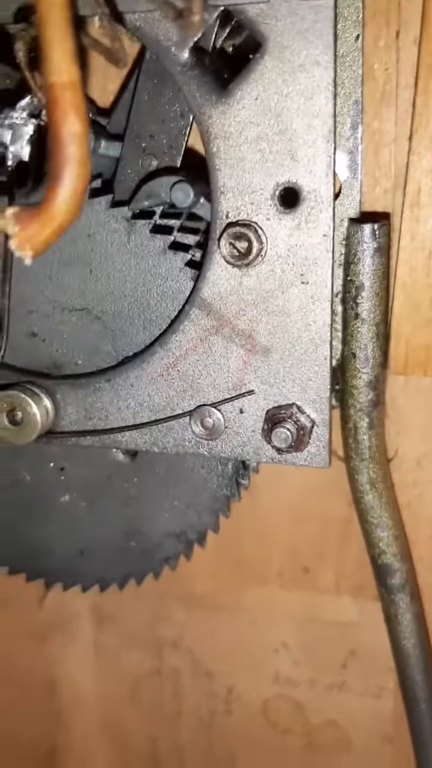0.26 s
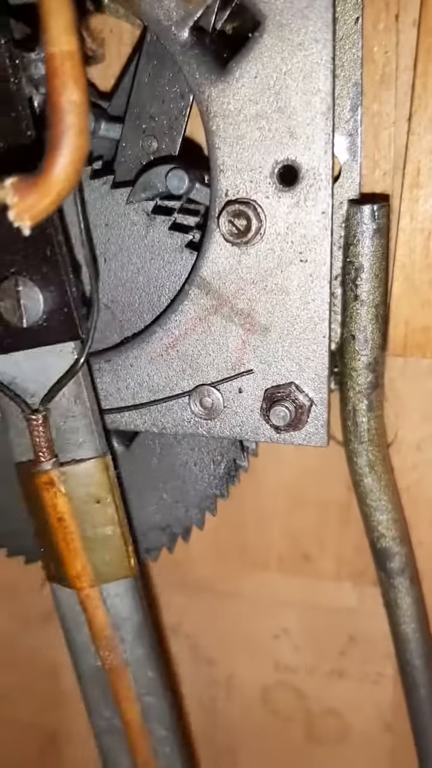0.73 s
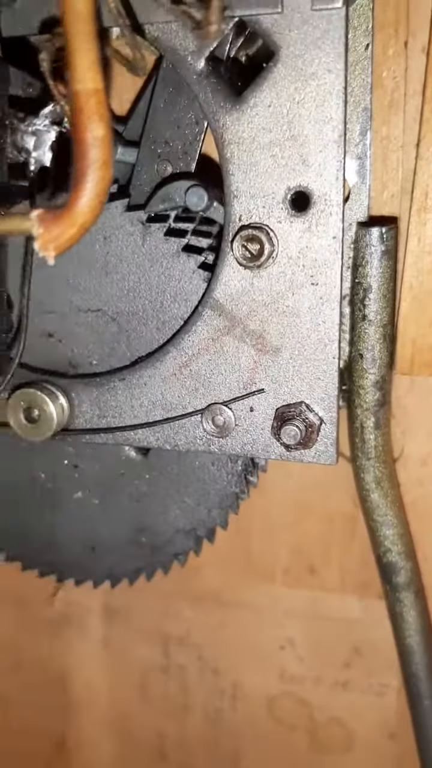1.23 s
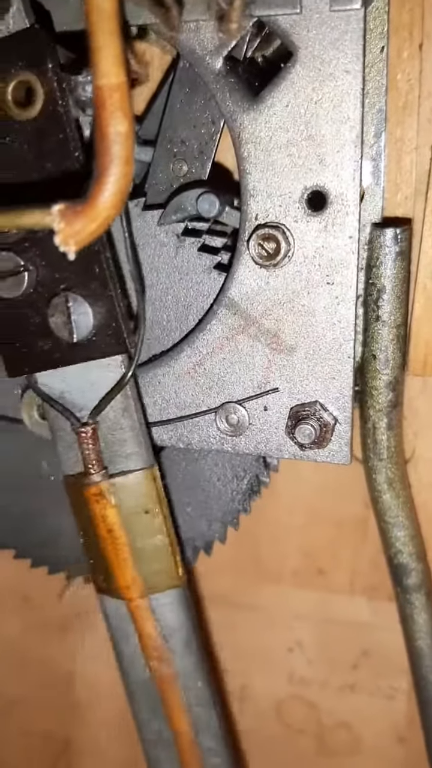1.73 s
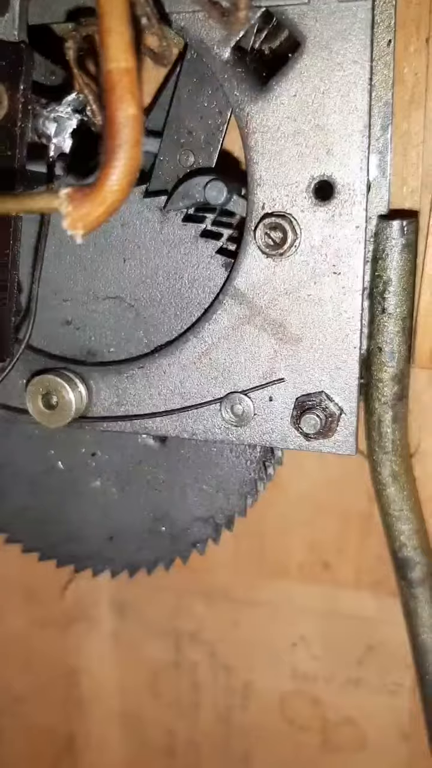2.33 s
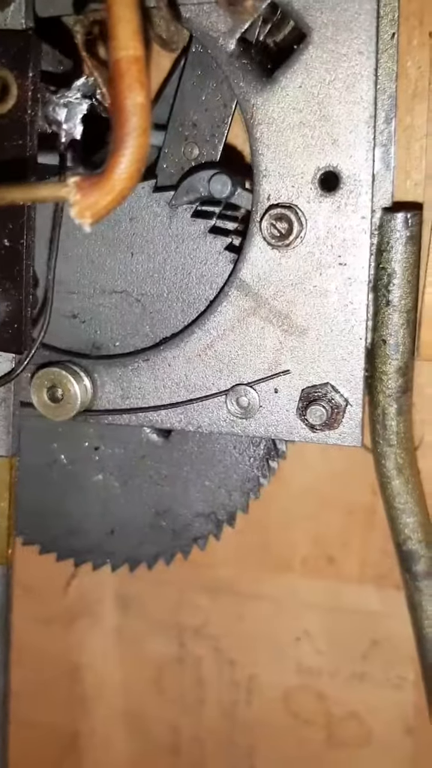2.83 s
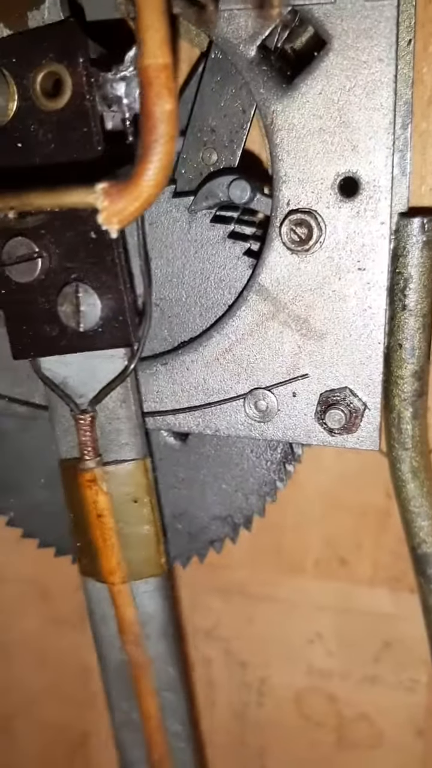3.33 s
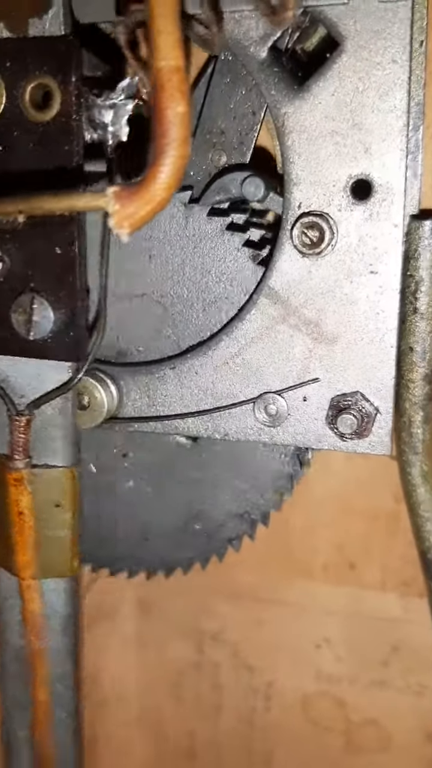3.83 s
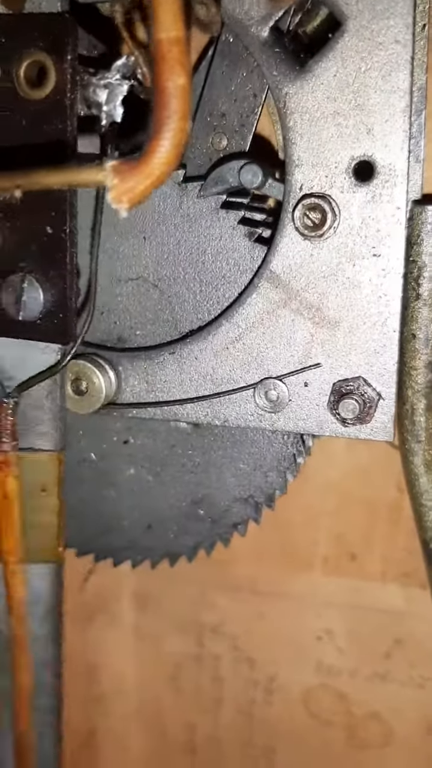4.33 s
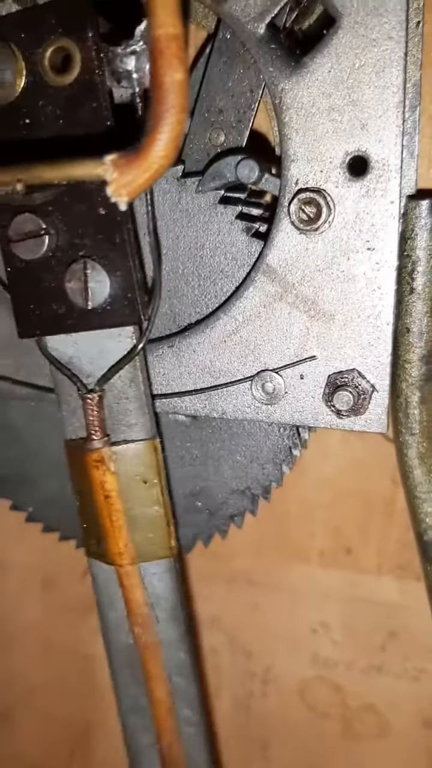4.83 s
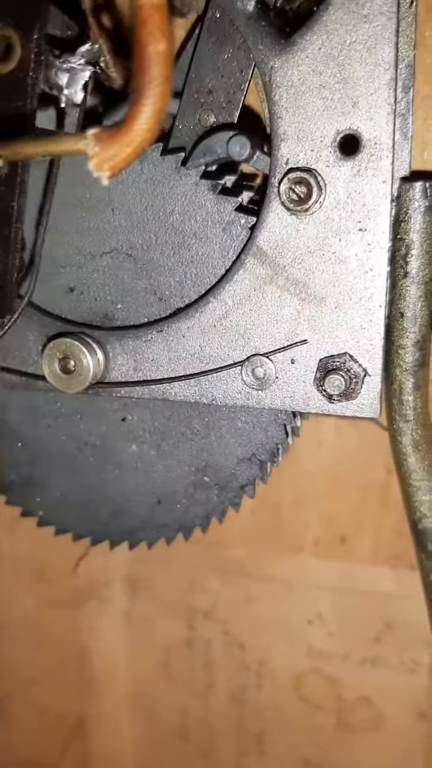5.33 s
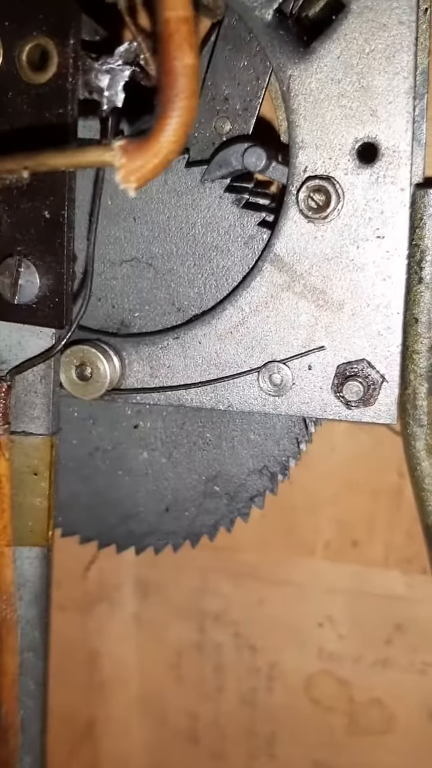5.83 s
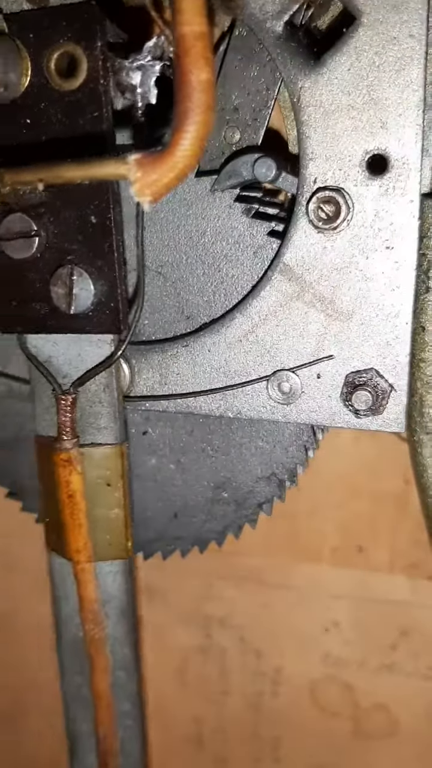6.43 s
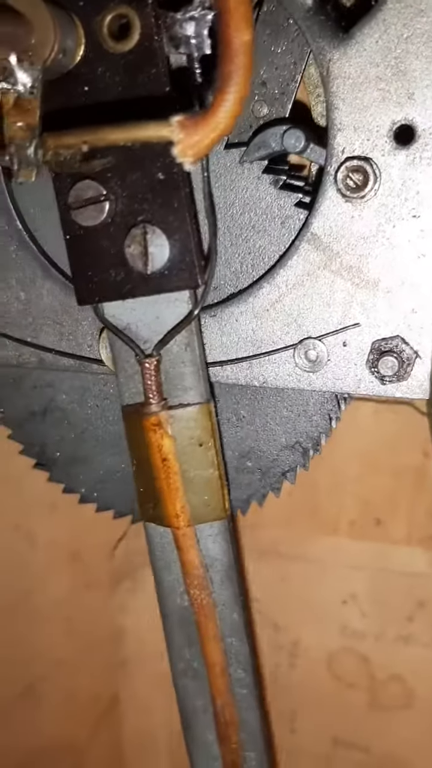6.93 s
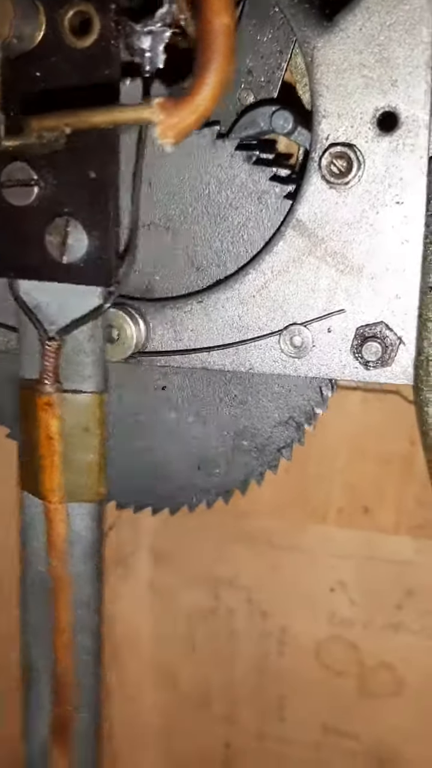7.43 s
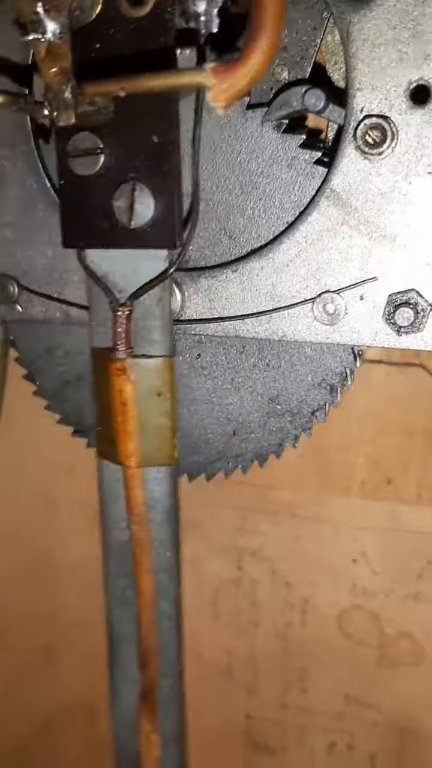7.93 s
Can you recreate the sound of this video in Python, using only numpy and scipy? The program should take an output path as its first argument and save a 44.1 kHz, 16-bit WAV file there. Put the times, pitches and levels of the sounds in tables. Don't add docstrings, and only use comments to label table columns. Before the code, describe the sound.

An old clock mechanism knocks and clatters unevenly, its wooden case thudding softly, with tiny high pings, faint distant ticking and constant microphone hiss.

```python
import sys
import numpy as np
from scipy import signal
from scipy.fft import rfft, irfft, next_fast_len
from scipy.io import wavfile
from scipy.ndimage import uniform_filter1d

SR = 44100
rng = np.random.default_rng(int(sys.argv[2]) if len(sys.argv) > 2 else 0)


def makeup_ratio(level_db):
    decades = np.asarray(level_db, float) / 20
    return 10 ** decades


def to_wav(sig):
    pcm = np.clip(np.atleast_2d(sig), -1, 1) * 32767
    pcm = np.round(pcm).astype(np.int16)
    wavfile.write(sys.argv[1], SR, pcm.T)


N = 360297

# frequency in Hz, level in dB per Hz.
HISS_COLOUR = [(50, -9), (250, -21.5), (450, -11), (590, -7), (750, -7), (1100, -3), (1550, -3.5),
               (1900, 0), (5500, 0), (7400, -4), (8700, -21), (10300, -15.5), (12500, -9.5), (15000, -10.5)]
# centre in Hz, width in Hz, lift in dB.
CASE_AIR = [(592, 85, 5), (1530, 53, 7.5)]
HISS_DB, HISS_TOP_HZ = -48.5, 15800

# start in seconds, peak in dB, rub in seconds, pitch in Hz.
RUBS = [
    (.002, -30.5, 0.034, 1476),
    (.53, -42.5, 0.044, 470),
    (1.451, -40, 0.052, 500),
    (2.076, -28, 0.022, 1483),
    (3.501, -46, 0.042, 497),
    (5.983, -33.5, 0.0084, 1520),
    (6.56, -45, 0.067, 508),
    (6.747, -38.5, 0.015, 1560),
    (7.09, -53, 0.069, 600),
    (7.423, -30.5, 0.056, 1480),
]

# frequency in Hz, level in dB, 60 dB decay in seconds.
FAR_MODES = [(1530, -8, .06), (2400, -1, .05), (3480, 0, .05), (4100, -5, .03), (5000, -5, .03),
             (5900, 0, .04), (7200, -8, .03)]
# start in seconds, peak in dB, pitch in Hz.
STRAY_TICKS = [
    (2.3712, -37, 1900),
    (3.02, -42, 3480),
    (5.4967, -34, 7000),
    (7.1092, -42, 3480),
]
QUICK_START_S, QUICK_BEAT_S, QUICK_LIMP_S, QUICK_DB = 0.0218, 0.2778, 0.0039, -31
TOOTH_S, TOOTH_BEATS, TOOTH_WORST = 0.0036, 7.4, 5.42
DRIFT_S, DRIFT_BEATS, DRIFT_LATEST = 0.0107, 36.75, 0.28
SLOW_START_S, SLOW_BEAT_S, SLOW_LIMP_S, SLOW_DB = 0.0906, 0.6677, -0.005, -33.5
TICK_HZ, TOCK_HZ, SLOW_HZ = 2800, 2400, 5500

# start in seconds, peak in dB, pitch in Hz.
NUDGES = [(0.029, -27.5, 1560), (0.057, -38, 450), (0.157, -37, 830), (1.055, -42, 680), (1.469, -35, 480),
          (2.215, -38, 920), (3.228, -33.5, 560), (3.29, -41, 815), (3.993, -36, 950), (5.242, -36, 830),
          (5.266, -35, 1570), (5.498, -37, 447), (5.941, -43, 832), (6.119, -40, 480), (7.625, -36.5, 1480),
          (7.799, -36.5, 1520), (8.054, -32.5, 1480), (8.123, -39, 540)]
# start in seconds, peak in dB, contact in seconds, pitch in Hz.
KNOCKS = [(0.387, -23, 0.012, 676), (0.785, -28.5, 0.0033, 1210), (1.793, -26, 0.0034, 836),
          (2.098, -28, 0.021, 1300), (2.493, -19.5, 0.0075, 1290), (2.534, -24.5, 0.0075, 610),
          (2.551, -18, 0.029, 810), (2.563, -35, 0.0097, 1320), (3.085, -22.5, 0.011, 860),
          (3.115, -14, 0.0081, 1520), (3.75, -12, 0.015, 1540), (3.761, -14.5, 0.014, 980),
          (3.799, -22.5, 0.0058, 1510), (3.82, -25.5, 0.032, 730), (4.38, -16.5, 0.0088, 775),
          (4.461, -12.5, 0.0085, 1460), (4.498, -32, 0.019, 1600), (4.963, -23.5, 0.011, 900),
          (5.575, -14.5, 0.0071, 1000), (5.627, -19.5, 0.0027, 1000), (5.639, -15, 0.006, 836),
          (5.686, -20, 0.02, 940), (7.46, -30.5, 0.034, 765), (7.577, -27, 0.0048, 990),
          (7.874, -20, 0.0045, 1750)]
# frequency in Hz, level in dB, 60 dB decay in seconds.
PLATE_MODES = [(450, -4, .06), (590, -3, .07), (807, 0, .055), (950, -4, .05), (1145, -6, .05),
               (1320, -2, .055), (1490, 0, .055), (2050, -10, .03)]

# time of peak in seconds, back panel in dB,
# side panels in dB above the back, 60 dB decay in seconds.
THUDS = [(0.06, -37, -2, 0.26), (0.392, -34, -1.5, 0.34), (0.79, -47, 6.5, 0.17), (1.062, -55, 1, 0.36),
         (1.466, -48.5, 0.5, 0.4), (1.8, -44.5, -4, 0.36), (2.091, -48.5, 5.5, 0.37),
         (2.234, -49.5, -1, 0.67), (2.5, -41, 0, 0.42), (3.099, -38.5, 1.5, 0.62), (3.762, -31.4, -1, 0.77),
         (4.385, -37, 0, 0.6), (4.769, -58, 0, 0.26), (4.97, -42.5, 3, 0.33), (6.122, -42, -6, 0.53),
         (7.275, -65.5, -18, 0.67), (7.588, -42.5, -1.5, 0.29), (7.879, -38.5, 3, 0.31)]
# time of peak in seconds, back panel in dB,
# side panels in dB above the back, 60 dB decay in seconds.
SWAYS = [(0.03, -52.5, 10, 0.21), (0.19, -42.5, -6.5, 0.27), (0.245, -52, -11, 0.1), (0.355, -48, -2, 0.17),
         (0.82, -46.5, -2, 0.2), (0.875, -55, -8, 0.15), (0.979, -56, -8, 0.33), (1.902, -54, 6, 0.28),
         (2.551, -34, -2.1, 0.48), (2.799, -57, -1.5, 0.91), (3.243, -46, -2.5, 0.18),
         (3.319, -46, 1.5, 0.32), (3.931, -40, -1, 0.076), (4.016, -48, -4, 0.8), (4.479, -44, -3, 0.25),
         (4.59, -40, -4.5, 0.21), (5.061, -48, -12, 0.21), (5.272, -52.2, -4, 0.88),
         (5.411, -42, -4.5, 0.15), (5.518, -55.5, 7, 0.25), (5.605, -34.0, 1, 0.74),
         (5.71, -30.5, -3, 0.075), (5.779, -36.5, -22, 0.15), (5.962, -44.5, -2.5, 0.3),
         (6.371, -53, -3, 0.22), (7.483, -44.6, 3.5, 0.29), (7.708, -51, -7, 0.41),
         (7.818, -42.5, -13, 0.34), (8.1, -51.5, -4, 0.96)]
# centre in Hz, width in Hz, level in dB.
BACK_PANEL = [(113.5, 31, -3), (185.2, 9.8, 5.5), (201.6, 6.8, 8.5), (235.6, 17.3, 2.5)]
# centre in Hz, width in Hz, level in dB.
SIDE_PANELS = [(341.5, 51, -0.5), (367.2, 31, 3.5), (450, 270, -11)]
THUD_RISE_S, SWAY_RISE_S = 0.03, 0.17
SIDES_RING = 0.77

# start in seconds, peak in dB, rattle in seconds, top band in dB.
CLACKS = [(0.386, -23.5, 0.012, -18), (1.7925, -30.5, 0.0056, -27), (2.492, -13.5, 0.016, -11),
          (2.503, -23, 0.015, -26), (2.5501, -22.5, 0.014, -13.5), (3.071, -33, 0.0097, -34),
          (3.0863, -20, 0.013, -14), (3.7511, -14.5, 0.01, -14.5), (4.3786, -15.5, 0.01, -10.5),
          (4.3884, -24.5, 0.012, -28), (4.462, -41, 0.0076, -28), (4.963, -28.5, 0.012, -31),
          (5.5736, -6.5, 0.0082, -14), (5.5882, -16.5, 0.012, -20), (5.6287, -19.5, 0.013, -12.5),
          (5.687, -18, 0.0086, -12.5), (7.873, -24.5, 0.0068, -25)]
# frequency in Hz, level in dB, 60 dB decay in seconds.
WHEEL_MODES = [(2400, -5, .02), (3360, -6, .025), (3730, 0, .02), (4060, -4, .025), (4550, -4, .025),
               (5400, -3, .015), (5710, -4, .025), (6600, -2, .01)]

# start in seconds, tap in dB, ring in dB, long mode in dB.
PINGS = [
    (2.2211, -26.5, -34, -44),
    (3.3403, -40, -39, -52),
    (4.0335, -25.5, -31, -46),
    (4.6111, -35.5, -34.5, -56),
    (5.2063, -30.5, -41, -39),
    (6.6185, -35.5, -40, -35),
    (7.5992, -35.5, -40, -46),
    (8.1214, -40, -51, -48),
]
PIN_HZ = [5940, 8930, 9360, 13620, 13850, 15550]
# level in dB, 60 dB decay in seconds.
PIN_STRENGTHS = [(-18, .15), (-18, .085), (-14, .035), (-3, .05), (0, .06), (-18, .05)]
# frequency in Hz, level in dB, 60 dB decay in seconds.
PIN_LONG_MODE = [(12400, 0, .2)]

# frequency in Hz, left-right likeness from 0 to 1.
NEAR_ALIKE = [(170, 0.93), (350, 0.78), (700, 0.71), (1100, 0.32), (3000, 0.06), (16000, 0.06)]
# frequency in Hz, left-right likeness from 0 to 1.
ROOM_ALIKE = [(170, 0.37), (350, 0.51), (700, 1), (1100, 0.011), (16000, 0.015)]
# frequency in Hz, left minus right in dB.
PORT_COLOUR = [(150, -2), (350, -1), (700, -4.5), (1100, -7.5), (2500, -8), (5500, -10), (7500, -6.5),
               (9000, 0), (11500, -2), (14000, -8)]
PORT_LAG_S = 0.000239


def unit(x):
    return x / np.sqrt(np.mean(x ** 2) + 1e-20)


def along(points, hz):
    f, v = np.transpose(points)
    return np.interp(np.log(hz + 1), np.log(f + 1), v)


def filtered(x, response):
    m = next_fast_len(N + 8192)
    hz = np.fft.rfftfreq(m, 1 / SR)
    return irfft(rfft(x, m) * response(hz), m)[..., :N]


def rattle(seconds, spiky_db, rise=0.001):
    t = np.arange(SR // 8) / SR
    sizes = makeup_ratio(spiky_db * rng.standard_normal(len(t)))
    envelope = (1 - np.exp(-t / rise)) * np.exp(-(t / max(seconds, 0.001)) ** 1.35)
    return rng.standard_normal((2, len(t))) * sizes * envelope


def ring(modes, scatter_db=3, lift_db=0):
    t = np.arange(SR // 5) / SR
    hz, db, t60 = np.transpose(modes)[..., None]
    db = db + scatter_db * rng.standard_normal(db.shape) + np.reshape(lift_db, (-1, 1))
    return np.sum(makeup_ratio(db - 60 * t / t60) * np.sin(2 * np.pi * hz * t), 0)


def clutter(lo_hz, hi_hz, t60, db):
    t = np.arange(SR // 5) / SR
    band = signal.butter(3, [lo_hz, hi_hz], "band", fs=SR, output="sos")
    return signal.sosfilt(band, rng.standard_normal(len(t)) * makeup_ratio(db - 60 * t / t60))


def strike(burst, response):
    return signal.fftconvolve(burst, response[None], axes=1)


def add(track, s, db, pair):
    track[:, round(s * SR):][:, :pair.shape[1]] += makeup_ratio(db) * pair / np.abs(pair).max()


def hiss():
    z = signal.stft(rng.standard_normal((2, N)), nperseg=512)[2]
    field = rng.standard_normal(z.shape[1:])
    field = uniform_filter1d(uniform_filter1d(field, 12, 0), 4, 1)
    patchy = signal.istft(z * makeup_ratio(1.5 * unit(field)), nperseg=512)[1][:, :N]

    def colour(hz):
        air_db = sum(db * np.exp(-((hz - c) / w) ** 2) for c, w, db in CASE_AIR)
        return makeup_ratio(along(HISS_COLOUR, hz) - 40 * (hz > HISS_TOP_HZ) + air_db)

    faint = (rng.random(N) < 30 / SR) * rng.random(N)
    fade = np.exp(-np.arange(SR // 8) / (0.019 * SR))
    swell = 1 + 0.77 * signal.fftconvolve(faint, fade)[:N]
    return makeup_ratio(HISS_DB) * swell * unit(filtered(patchy, colour))


def rod(track):
    for s, db, seconds, hz in RUBS:
        rub = rattle(seconds, spiky_db=7.0, rise=0.00045)
        add(track, s, db, strike(rub, ring([(hz, 0, 0.05), (0.99 * hz, -4, 0.04)], 1.1)))
    return track


def beats():
    k = np.arange(int(N / SR / QUICK_BEAT_S) + 1)

    def cycle(size, length, top):
        return size * np.cos(2 * np.pi * (k - top) / length)

    limp = (QUICK_LIMP_S + cycle(TOOTH_S, TOOTH_BEATS, TOOTH_WORST)) * (-1) ** k
    drift = cycle(DRIFT_S, DRIFT_BEATS, DRIFT_LATEST)
    quick_s = QUICK_START_S + QUICK_BEAT_S * k + limp + drift
    quick = [(s, QUICK_DB, TOCK_HZ if j % 2 else TICK_HZ) for j, s in enumerate(quick_s)]
    j = np.arange(int(N / SR / SLOW_BEAT_S) + 1)
    slow_s = SLOW_START_S + SLOW_BEAT_S * j + SLOW_LIMP_S * (-1) ** j
    slow = [(s, SLOW_DB, SLOW_HZ) for s in slow_s]
    return quick + slow + STRAY_TICKS


def far_clocks(track):
    mode_hz = np.transpose(FAR_MODES)[0]
    for s, db, hz in beats():
        octaves = np.abs(np.log2(mode_hz / hz))
        lift_db = -np.minimum(5 * octaves, 6)
        body = ring(FAR_MODES, 2.5, lift_db) + clutter(1800, 7500, t60=0.04, db=7)
        add(track, s, db, strike(rattle(0.014, spiky_db=4, rise=0.0015), body))
    return track


def lever(track):
    mode_hz = np.transpose(PLATE_MODES)[0]
    nudges = [(s, db, 0.016, hz) for s, db, hz in NUDGES]
    for s, db, seconds, hz in KNOCKS + nudges:
        lift_db = -7 * np.log2(mode_hz / hz) ** 2
        plate = ring(PLATE_MODES, 1.8, lift_db) + clutter(0.5 * hz, 1.35 * hz, t60=0.05, db=11)
        add(track, s, db, strike(rattle(seconds, spiky_db=5, rise=0.0003), plate))
    return track


def shudder(panels):
    def modes(f):
        total = 0
        for k, (c, w, db) in enumerate(panels):
            damping = 1j * f * w
            total = total + (-1) ** k * makeup_ratio(db) * damping / (c * c - f * f + damping)
        return total

    x = unit(filtered(rng.standard_normal((2, N)), modes))
    power = np.abs(uniform_filter1d(x ** 2, 1800, axis=1))
    return unit(x / np.sqrt(power + 0.029))


def case():
    t = np.arange(0, N, 64) / SR
    back, sides = 0, 0
    for jolts, rise in [(THUDS, THUD_RISE_S), (SWAYS, SWAY_RISE_S)]:
        s, db, sides_db, t60 = np.transpose(jolts)[..., None]

        def swing(ring_s):
            return -60 * np.maximum((s - t) / rise, (t - s) / ring_s)

        back = back + np.sum(makeup_ratio(db + swing(t60)) ** 2, 0)
        sides = sides + np.sum(makeup_ratio(db + sides_db + swing(SIDES_RING * t60)) ** 2, 0)

    def full(power):
        return np.interp(np.arange(N) / SR, t, np.sqrt(power))

    return full(back) * shudder(BACK_PANEL) + full(sides) * shudder(SIDE_PANELS)


def pawls(track):
    top = signal.butter(3, 10500, "high", fs=SR, output="sos")
    for s, db, seconds, top_db in CLACKS:
        burst = rattle(seconds, spiky_db=6.5, rise=0.000043)
        wheel = ring(WHEEL_MODES) + clutter(1450, 6600, t60=0.0069, db=26)
        add(track, s, db, strike(burst, wheel))
        add(track, s, db + top_db + 14.0, signal.sosfilt(top, burst))
    return track


def pin(track):
    tap_modes = [(6500, 0, 0.005), (7300, -3, 0.004), (4200, -14, 0.004), (15000, -6, 0.003)]
    pin_modes = np.column_stack([PIN_HZ, PIN_STRENGTHS])
    for s, db, ring_db, long_db in PINGS:
        tap = strike(rattle(0.002, spiky_db=2, rise=0.001), ring(tap_modes))
        for late, gain_db in [(0, 11), (0.005, -8), (0.0105, -14)]:
            add(track, s + late, db + gain_db, tap)
        blow = rattle(0.00097, spiky_db=-8.5, rise=0.00077)
        add(track, s, ring_db + 13, strike(blow, ring(pin_modes, 2.2)))
        add(track, s, long_db + 4.0, strike(blow, ring(PIN_LONG_MODE, 0)))
    return track


def spread(pair, alike):
    def shares(hz):
        turn = np.arccos(np.clip(along(alike, hz), -1, 1)) / 2
        return np.array([np.cos(turn), np.sin(turn)])

    mid, side = filtered(pair, shares)
    return np.array([mid + side, mid - side])


def scene():
    far = far_clocks(np.zeros((2, N + SR)))[:, :N] + hiss()
    blows = pin(pawls(lever(rod(np.zeros((2, N + SR))))))
    near = blows[:, :N] + case()
    ports_opposed = makeup_ratio(np.array([[0.6], [-0.6]]))
    return spread(near, NEAR_ALIKE) * ports_opposed + spread(far, ROOM_ALIKE)


def low_pass(x):
    return signal.sosfilt(signal.butter(12, 16900, fs=SR, output="sos"), x)


def record(dry):
    def ports(hz):
        colour = makeup_ratio(np.outer([0.5, -0.5], along(PORT_COLOUR, hz)))
        arrival = np.exp(np.outer([1j, -1j], np.pi * hz * PORT_LAG_S))
        return colour * arrival

    def edges(hz):
        return 1 / np.sqrt((1 + (hz / 16400) ** 200) * (1 + (70 / (hz + 1)) ** 4))

    mix = filtered(dry, lambda hz: ports(hz) * edges(hz))
    return low_pass(mix)


dry = scene()
out = record(dry)
to_wav(out)
```